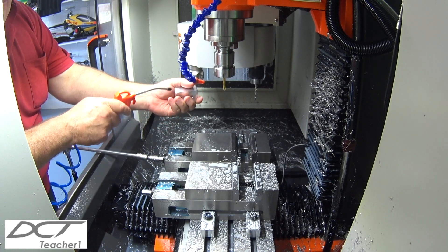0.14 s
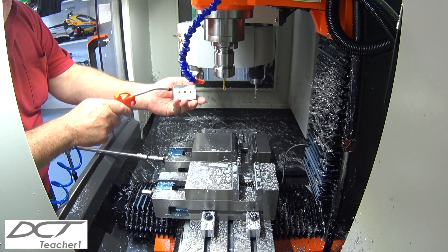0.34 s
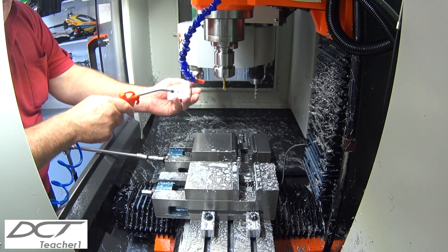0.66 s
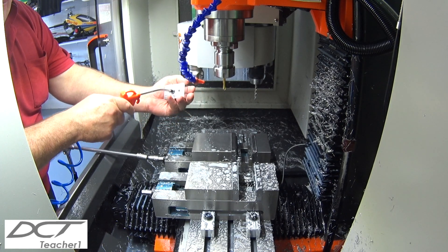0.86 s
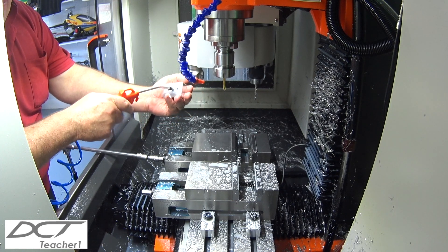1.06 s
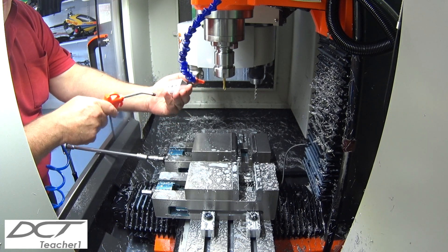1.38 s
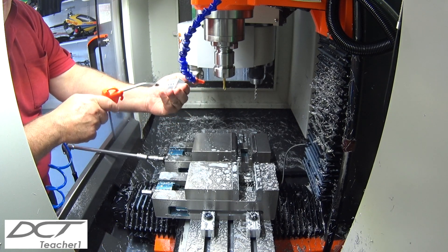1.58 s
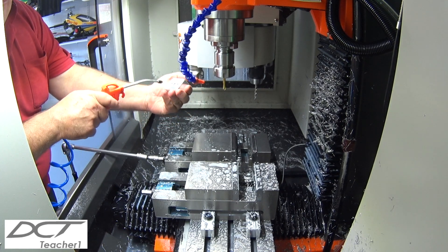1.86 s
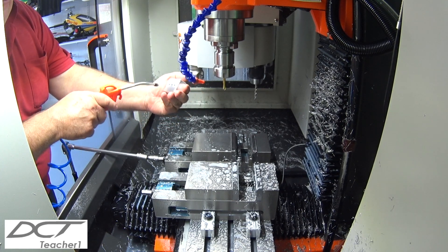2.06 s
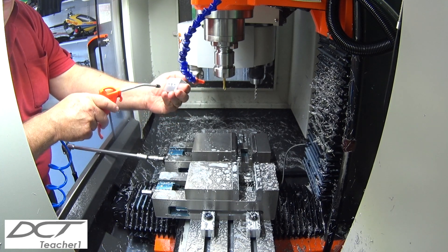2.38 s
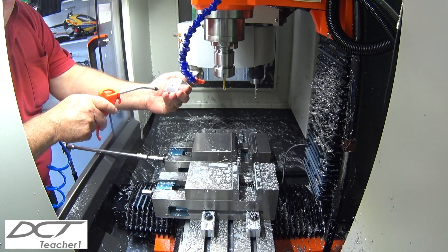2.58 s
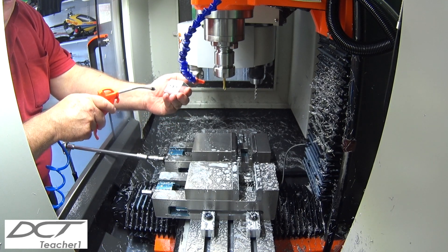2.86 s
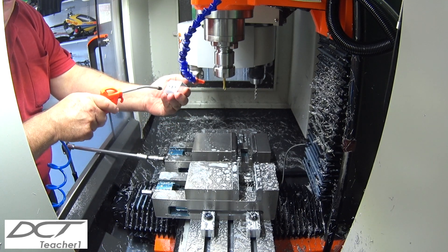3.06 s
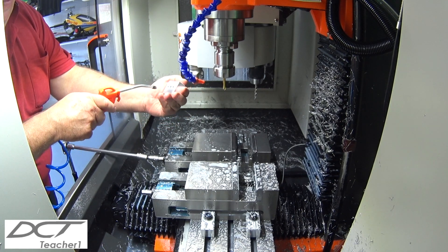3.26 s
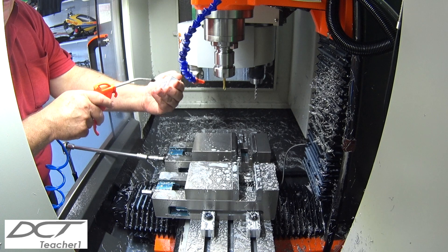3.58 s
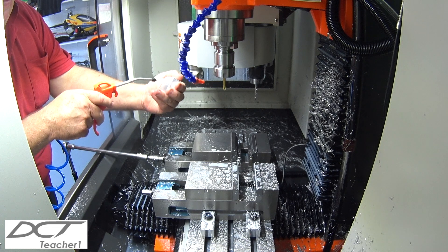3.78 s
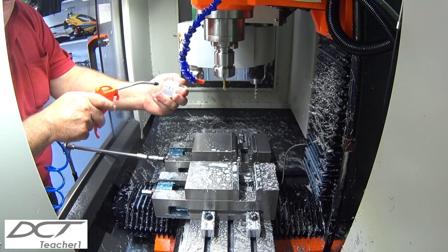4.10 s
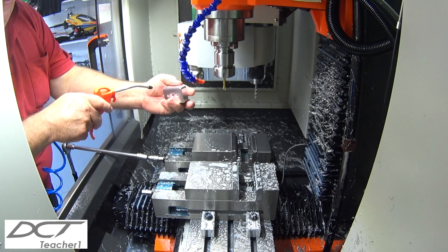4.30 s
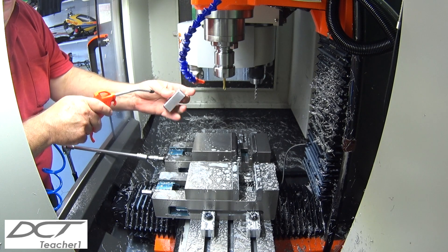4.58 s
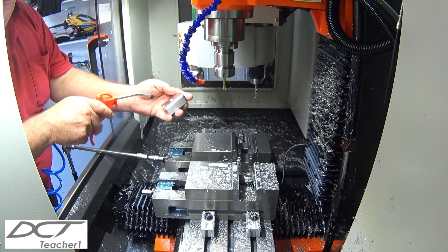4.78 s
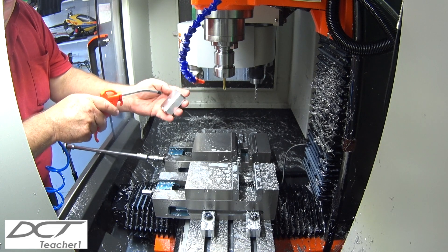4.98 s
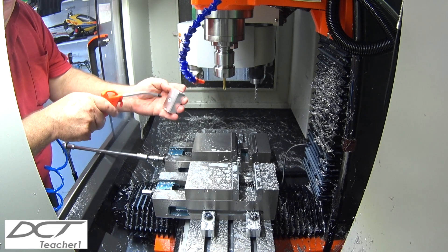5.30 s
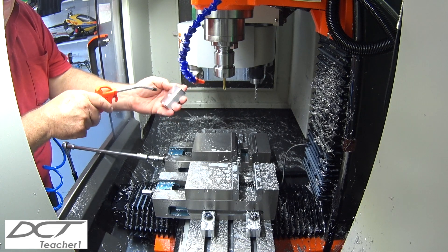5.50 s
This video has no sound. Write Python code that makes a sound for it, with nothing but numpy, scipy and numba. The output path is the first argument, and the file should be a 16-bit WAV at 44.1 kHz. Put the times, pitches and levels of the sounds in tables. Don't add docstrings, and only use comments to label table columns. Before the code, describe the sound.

A compressed-air blow gun hisses fiercely over a small drilled metal part, with flickering whistles, then two short bursts over a throbbing compressor hum.

```python
import sys
import numpy as np
from scipy import signal
from scipy.fft import rfft, irfft, next_fast_len
from scipy.io import wavfile
from scipy.ndimage import uniform_filter1d
from numba import njit

SR = 44100
rng = np.random.default_rng(int(sys.argv[2]) if len(sys.argv) > 2 else 0)


def how_loud(loudness_db):
    steps = np.asarray(loudness_db, float) / 20
    return 10 ** steps


def digitize_waveform(pressure):
    field = np.atleast_2d(pressure).T
    bounded = np.clip(field, -1, 1)
    quanta = np.round(bounded * 32767).astype(np.int16)
    wavfile.write(sys.argv[1], SR, quanta)


N = 249165
T = np.arange(N) / SR
HAND_T = T[::40]

# valve opens in seconds, shuts in seconds, gain control pushed to in dB.
TRIGGER = [
    (0, 2.19, -7),
    (3.034, 3.34, -8.5),
    (5.047, 6, -7.5),
]
OPEN_S, SHUT_S = 0.012, 0.012

# time in seconds, impact on the face in dB, nozzle turned to the camera in dB.
AIM = [
    [(0.0, 5, -1), (0.15, 3.5, 1), (0.3, 5, 2), (0.35, 4.5, 3), (0.41, -2.5, 0.5), (0.49, -0.5, -1.5),
     (0.58, -5.5, 4.5), (0.67, -4.5, 6), (0.76, 1, 3), (0.89, 0, 4.5), (1.09, -4.5, 6), (1.2, 0, 0),
     (1.64, -0.5, -0.5), (1.69, -7.5, -9.5), (1.73, 1.5, -4), (1.92, -2, -6), (1.99, 0, 1),
     (2.19, -3.5, -8)],
    [(3.04, -1.5, -6.5), (3.15, -4.5, 5), (3.23, 2.5, -6), (3.29, -4.5, -3.5), (3.34, -0.5, -8.5)],
    [(5.05, 4.5, -0.5), (5.2, 2, 4.5), (5.29, 0, 4), (5.45, 5.5, -4.5), (5.51, 5, 1.5), (5.65, 6, -3.5)],
]
# level in dB, share of impact (ratio), share of nozzle turn (ratio),
# level swallowed by a centred hole in dB, lift by the pocket (ratio).
PLACES = [
    (-30.5, 1.21, .05, 13.5, .2),
    (-42, 1.4, 0.058, 16.5, 0.36),
    (-27, 0.23, 0.13, 8.5, 0.11),
    (-34.5, 0.046, 0.98, 8.5, .05),
    (-44, 0.085, .5, 9, .1),
    (-51, .05, 1.2, 10.5, 0.044),
    (-41, 0.23, .05, 16, 0.008),
]
# frequency in Hz, density in dB per Hz.
HISS = [(180, -61), (300, -42), (775, -27), (836, -32), (1030, -24), (1310, -16.5), (1620, -13),
        (1830, -14), (2230, -17), (2440, -6.5), (4070, -4.5), (4870, -0.5), (8140, -16), (9600, -22.5),
        (11000, -27.5), (14300, -51.5), (22000, -120)]
FLUTTER_DB = 0.7

# start in seconds,
# length in seconds, whistle in dB, pitch in Hz, centred 0-1.
CROSSINGS = [(0.204, 0.024, -20, 5330, 0.3), (0.308, 0.016, -11.5, 5290, 0.73),
             (0.355, 0.038, -21, 5410, 0.24), (0.461, 0.11, -21.5, 5385, 0),
             (0.651, .083, -16.5, 5265, .75), (0.738, .054, -14, 5140, .9), (0.8, .031, -17, 5135, .85),
             (0.84, .028, -22, 5040, .8), (1.094, 0.0099, -9, 5145, 1), (1.11, 0.014, -27.5, 5250, 1),
             (1.214, 0.025, -18, 5300, 0.48), (1.245, .018, -16.5, 5120, .8),
             (1.272, .022, -15.5, 5345, .9), (1.304, 0.015, -25, 5200, .3), (1.377, 0.011, -16, 5280, 0.43),
             (1.472, 0.063, -26, 5250, 0.3), (1.548, .035, -25, 5300, 0), (1.589, 0.032, -16, 5120, 0.27),
             (1.745, 0.03, -20.5, 5350, 0.34), (1.818, 0.03, -25.5, 4980, 0.01),
             (1.882, 0.04, -18, 5240, .4), (2.001, 0.047, -14.5, 5224, 0.5),
             (2.092, 0.032, -18.5, 5190, 0.27), (2.126, 0.051, -26, 5170, 0.2),
             (3.02, 0.05, -18.5, 5106, .35),
    (3.08, 0.1, -21.5, 5360, .15),
    (3.195, 0.07, -17, 5160, .4),
    (3.295, 0.054, -23.5, 5217, .1),
    (5.15, 0.08, -22, 4800, .1),
    (5.25, 0.087, -29.5, 5350, .1),
]
IDLE_DB, IDLE_HZ = -29.5, 5120
WIDE_HZ, NARROW_HZ = 200, 31.9
CATCH_S, LET_GO_S, FADE_SHARE = 0.005, 0.012, 0.03
SINK_IN_SHARE, REFILL_S = 0.59, 0.03
SAG_HZ_PER_S, WANDER_SHARE, STRAND_HZ = 1100, 0.35, 90

# centre in seconds, length in seconds, ring in dB.
POCKET_PASSES = [(0.11, 0.015, -38), (0.196, 0.012, -27.5), (0.433, 0.023, -33.5), (0.518, 0.023, -34.5),
                 (0.81, 0.014, -36), (1.068, 0.013, -29), (1.19, 0.011, -29.5), (1.368, 0.021, -29.5),
                 (1.466, 0.012, -23.5), (1.538, 0.021, -24.5), (1.59, 0.048, -40.5), (1.656, 0.017, -27.5),
                 (1.738, 0.01, -32), (1.858, .025, -27), (1.968, 0.025, -23), (2.102, 0.017, -28),
                 (3.09, 0.015, -34), (3.158, 0.019, -30), (3.29, 0.019, -32.5), (5.4, 0.058, -40)]
POCKET_HZ, POCKET_WIDTH_HZ = 2432, 34

# start in seconds, peak in dB, upper part in dB, length in seconds.
PUFFS = [(0.222, -49, 7, 0.013), (0.322, -39, 6, 0.0085), (0.367, -36.5, -2, 0.012), (0.539, -46, 5, 0.04),
         (0.652, -37, -3, 0.022), (0.725, -40.5, -0.5, 0.022), (0.798, -46, -5, 0.015),
         (1.096, -38, -4, 0.0083), (1.233, -41.5, -14, 0.022), (1.306, -44.5, 5, 0.0095),
         (1.387, -48, 4, 0.0091), (1.492, -55, 10, 0.0086), (1.58, -52.5, 3.5, 0.028),
         (1.751, -45.5, 6, 0.011), (1.896, -36, -2.5, 0.012), (2.014, -32.5, -4.5, 0.016),
         (2.1, -41.5, -2, 0.032), (2.147, -61, 11.5, 0.013), (3.043, -38.5, -10.5, 0.022),
         (3.1, -49.5, 6.5, 0.039), (3.203, -39, -1, 0.025), (3.253, -39.5, -2, 0.016),
         (5.194, -52, 7.5, 0.017), (5.269, -52.5, 7, 0.023)]

# delay in ms, level in dB.
WALLS = [(2.3, -19.5), (3.7, -18), (5.3, -17), (7.9, -15), (11.3, -15), (15.7, -17)]
# frequency in Hz, width in Hz, boost in dB.
CABIN = [(1342, 89, 12), (1219, 61, 9.5), (2840, 160, 4), (3890, 140, 4)]
# frequency in Hz, t60 in seconds.
ROOM = [(700, 0.34), (2500, 0.49), (5200, 0.47), (9000, 0.3)]
# frequency in Hz, gain in dB.
ECHO = [(1000, -0.5), (3000, -3.5), (4500, -2), (5200, -1), (6200, -3.5), (10000, -4)]
ROOM_DB, DUCK_DB = -10.5, 4.5

# frequency in Hz, density in dB per Hz.
SHOP = [(18, -64), (30, -37.5), (92, -0.5), (146, -5.5), (173, -4), (243, -3.5), (541, -24), (798, -18),
        (1040, -20.5), (1330, -19), (1620, -20.5), (2630, -23), (3270, -25.5), (3880, -21), (10000, -49),
        (13000, -94), (22000, -120)]
# frequency in Hz, width in Hz, level in dB.
INTAKE = [(201, 8.4, -60.5), (245.3, 12, -59), (45, 60, -69.5), (312, 27, -68), (440, 15, -71),
          (615, 13, -69.5), (702, 16, -72), (2647, 330, -62.5), (3830, 170, -72), (4790, 81, -76),
          (5460, 500, -73.5)]
# frequency in Hz, level in dB.
DRONES = [
    (143, -56.5),
    (702, -73.5),
]
STROKE_HZ, STROKE_AT_S, THROB_DB = 7.87, 4.01, -48.5
MOTOR_HZ, MOTOR_DB = 818, -61

# frequency in Hz, side minus mid in dB.
SIDE_COLOUR = [(60, -32.5), (150, -17.5), (340, -12.5), (600, -0.5), (1060, -6.5), (1900, -6.5), (3100, -4.5),
               (3900, -16), (5600, -23), (6800, -4.5), (9000, -6), (11000, -11.5)]
# frequency in Hz, level in dB.
LAG = [(300, -33.5), (700, -6.5), (1300, -8), (2500, -24), (3800, -26.5), (5500, -34), (9000, -24)]
RIGHT_DB, SIDE_DB, PUFF_SIDE_DB = 0.6, -2, -2
TOP_GAIN_DB, SINK_DB_PER_S, RECOVER_S, RECOVER_BEND = 2.5, 2.5, 0.85, 1.43
LIMIT_DB, CEILING = -16.5, 0.43


def jet():
    hz, blown_db, width_hz, swallowed = crossings()
    passes = pocket_passes()
    *hiss_db, pocket_db = jet_db(swallowed, passes)
    ring_db = 20 * np.log10(how_loud(pocket_db) + passes)
    flow = valve()
    return reflect(flow * hiss(*hiss_db)) + flow * holes(hz, blown_db, width_hz, ring_db)


def valve():
    flow = 0
    for open_s, shut_s, _ in TRIGGER:
        rise = np.clip((T - open_s) / OPEN_S + 1, 0, 1) ** 2
        flow = flow + rise * np.exp(-np.maximum(T - shut_s, 0) / SHUT_S)
    return flow


def jet_db(swallowed, passes):
    impact_db, turn_db = curves(sum(AIM, []))
    over_pocket_db = 20 * np.log10(1 + passes / how_loud(-36))
    return [db + impact * impact_db + turn * turn_db - swallow_db * swallowed + lift * over_pocket_db
            for db, impact, turn, swallow_db, lift in PLACES]


def hiss(face_db, hand_db, edge_db, nozzle_db, finger_db, tip_db):
    air = colour(rng.standard_normal(N), HISS, CABIN[:3])

    def place(db, lo_hz, hi_hz, band_db, flutter_db=FLUTTER_DB):
        return how_loud(db + flutter_db * walk(40)) * level(band(air, lo_hz, hi_hz), band_db)

    out = place(hand_db, 250, 2375, 0.22)
    out += place(face_db, 2170, 3867, 0.52)
    out += place(edge_db, 4057, 6360, 1.5)
    out += place(nozzle_db, 6280, 11000, 0.16, flutter_db=1.4)
    out += place(finger_db, 1463, 2244, 0)
    out += place(tip_db, 9060, 11560, 0)
    return how_loud(FLUTTER_DB * walk(35)) * out


def holes(hz, blown_db, width_hz, pocket_db):
    width_hz = np.clip(width_hz, 40, 900)
    blur = 0.8 + 0.35 * np.maximum(-23 - blown_db, 0)
    apart_hz = 1.01 * np.maximum(width_hz - 45, 0)
    strand_hz = blur * np.minimum(width_hz, STRAND_HZ)
    upper = whistle(hz + apart_hz + 20 * walk(45), strand_hz)
    lower = np.clip(apart_hz / 30, 0, 1) * whistle(hz - apart_hz, strand_hz)
    drop_out_db = 0.43 * np.minimum(blown_db + 29.0, 0)
    hole = (upper + lower) * how_loud(blown_db - 6.0 + drop_out_db + 2 * walk(45))
    octave = band(hole ** 2, 9000, 11500) * how_loud(-21)
    ring = svf(rng.standard_normal(N), POCKET_HZ + 12 * walk(13), POCKET_WIDTH_HZ + 0 * T)
    pocket = level(band(ring, 2100, 2930), -4.5)
    return hole + octave + pocket * how_loud(pocket_db + 0.4 * np.minimum(pocket_db + 37.5, 0))


def whistle(hz, width_hz):
    ringing = svf(svf(rng.standard_normal(N), hz, width_hz), hz, 3.3 * width_hz)
    tone = level(ringing / np.sqrt(width_hz), 0)
    swing = uniform_filter1d(tone ** 2, size=60) ** 0.5
    return level(tone / (0.8 + swing), 0)


def crossings():
    blown, pitch, focus, swallowed = how_loud(IDLE_DB), how_loud(IDLE_DB) * IDLE_HZ, 0, 0
    for start, length, db, hz, centred in CROSSINGS:
        size = how_loud(db) * held(start, CATCH_S, length, LET_GO_S + FADE_SHARE * length)
        sag_hz = SAG_HZ_PER_S * np.clip(HAND_T - start - length / 2, -length, length)
        blown = blown + size
        pitch = pitch + size * (hz - sag_hz)
        focus = focus + size * centred
        sunk = np.clip(centred, 0, 1) * held(start, SINK_IN_SHARE * length, length, REFILL_S)
        swallowed = 1 - (1 - swallowed) * (1 - sunk)
    width_hz = WIDE_HZ + (NARROW_HZ - WIDE_HZ) * np.clip(1.25 * focus / blown, 0, 1)
    controls = (pitch / blown, 20 * np.log10(blown), width_hz, swallowed)
    hz, blown_db, width_hz, swallowed = map(smooth, controls)
    hz = hz + WANDER_SHARE * (width_hz - NARROW_HZ) * walk(30)
    return hz, blown_db, width_hz, swallowed


def pocket_passes():
    return smooth(sum(how_loud(db) * bump(s, length) for s, length, db in POCKET_PASSES))


def puffs():
    thud = level(band(rng.standard_normal(N), 35, 300), 0)
    rush = level(band(rng.standard_normal(N), 300, 1100), 0)
    low, high = valve() * how_loud(-65 + 2.2 * walk(22)) * how_loud([[0], [7]])
    for start, db, upper_db, length in PUFFS:
        gust = smooth(how_loud(db - 6.5) * bump(start + length, length))
        low = low + gust
        high = high + how_loud(upper_db) * gust
    return low * thud + high * rush


def reflect(x):
    taps = np.zeros(SR // 40)
    taps[0] = 1
    for ms, db in WALLS:
        taps[int(ms * SR / 1000)] = how_loud(db)
    return signal.fftconvolve(x, taps / np.sqrt(np.sum(taps ** 2)))[:N]


def echo(x, decays, size):
    t = T[:size]
    tail = 0
    for hz, t60 in decays:
        noise = band(rng.standard_normal(size), hz / 1.31, min(hz * 1.386, 15000))
        tail = tail + noise * 1000 ** (-t / t60)
    return signal.fftconvolve(x, tail / np.sqrt(np.sum(tail ** 2)))[:N]


def shop():
    phase = ((T - STROKE_AT_S) * STROKE_HZ) % 1
    throb = 0.55 + 0.67 * np.cos(2 * np.pi * (phase - 0.72))
    twelfth = np.sin(2 * np.pi * 12 * STROKE_HZ * T)
    intake = how_loud(THROB_DB + 0.87 * walk(6.7)) * throb * twelfth
    for hz, db in DRONES:
        swell = how_loud(db + 4.5 + 2.0 * walk(9))
        intake += swell * np.sin(2 * np.pi * np.cumsum(hz * (1 + 0.00702 * walk(6.6))) / SR)
    one = np.ones(N)
    for hz, width_hz, db in INTAKE:
        ring = svf(rng.standard_normal(N), hz * one, width_hz * one)
        intake += level(svf(ring, hz * one, 3 * width_hz * one), db)
    noise = level(colour(rng.standard_normal(N), SHOP, CABIN), -48.0)
    steady = band(noise, 6.5, 1100) * how_loud(-4.0 + 1.4 * walk(4.8))
    stroke = 0.59 + 1.3 * np.exp(-phase / 0.5) * (1 - np.exp(-phase / 0.07))
    valves = band(noise, 1100, 4400) * stroke ** 0.4 * how_loud(1.1 * walk(14))
    valves += band(noise, 4400, 6300) * stroke * how_loud(-0.5)
    valves += band(noise, 6300, 9200) * stroke * how_loud(-7.0 + 1.2 * walk(14))
    return intake + steady + valves


def motor():
    tone = np.sin(2 * np.pi * (MOTOR_HZ * T + rng.random()))
    return np.sqrt(2) * how_loud(MOTOR_DB + 0.787 * walk(36)) * tone


def gain_control():
    db = np.zeros(N)
    for open_s, shut_s, pushed_db in TRIGGER:
        depth_db = TOP_GAIN_DB - pushed_db + SINK_DB_PER_S * (np.minimum(T, shut_s) - open_s)
        back = np.exp(-(np.maximum(T - shut_s, 0) / RECOVER_S) ** RECOVER_BEND)
        db = np.where(T >= open_s, TOP_GAIN_DB - depth_db * back, db)
    return how_loud(uniform_filter1d(db, size=1000))


def level(x, db):
    return x * how_loud(db) / np.sqrt(np.mean(x ** 2))


def colour(x, points, peaks=()):
    size = next_fast_len(len(x))
    f = np.maximum(np.arange(size // 2 + 1) * SR / size, 1)
    hz, db = np.transpose(points)
    gain = how_loud(np.interp(np.log(f), np.log(hz), db))
    for centre_hz, width_hz, boost_db in peaks:
        gain = gain * how_loud(boost_db / (1 + (2 * (f - centre_hz) / width_hz) ** 2))
    return irfft(rfft(x, size) * gain, size)[:len(x)]


def band(x, lo_hz, hi_hz):
    return signal.sosfilt(signal.butter(4, [lo_hz, hi_hz], "band", fs=SR, output="sos"), x)


@njit
def svf(x, hz, width_hz):
    y, b, l = np.empty(len(x)), 0., 0.
    for i in range(len(x)):
        g, k = np.tan(np.pi * hz[i] / SR), width_hz[i] / hz[i]
        v = (b + g * (x[i] - l)) / (1 + g * (g + k))
        b, l, y[i] = 2 * v - b, l + 2 * g * v, k * v
    return y


def walk(rate_hz):
    k = int(SR / rate_hz)
    steps = np.repeat(rng.standard_normal(N // k + 1), k)
    return 1.757 * uniform_filter1d(uniform_filter1d(steps, k), k)[:N]


def held(start, rise, length, release):
    fall = np.exp(-np.maximum(HAND_T - start - length, 0) / release)
    return np.clip((HAND_T - start) / rise, 0, 1) * fall


def bump(centre, length):
    return np.exp(-0.5 * ((HAND_T - centre) / length) ** 2)


def smooth(control):
    return np.interp(T, HAND_T, control)


def curves(table):
    s, *columns = np.transpose(table)
    return [np.interp(T, s, c) for c in columns]


def sources():
    blast = jet()
    cabin = how_loud(ROOM_DB - DUCK_DB * valve()) * colour(echo(blast, ROOM, size=40000), ECHO)
    return blast + cabin + gain_control() * (shop() + motor())


def scene():
    mid = sources()
    late = np.imag(signal.hilbert(mid, next_fast_len(N)))[:N]
    side = colour(sources(), SIDE_COLOUR) * how_loud(SIDE_DB)
    side += colour(late, LAG)
    side += colour(puffs(), [(60, -14.5), (500, PUFF_SIDE_DB), (2000, 2)])
    mid = mid + puffs()
    return np.array([(mid + side) * how_loud(-RIGHT_DB / 2), (mid - side) * how_loud(RIGHT_DB / 2)])


def roll_off(x):
    return signal.sosfilt(signal.butter(12, 11180, fs=SR, output="sos"), x)


def record(dry):
    envelope = np.sqrt(uniform_filter1d(np.mean(dry ** 2, axis=0), size=300) + 1e-12)
    limited = dry / (1 + (envelope / how_loud(LIMIT_DB)) ** 4) ** 0.2
    clipped = CEILING * np.tanh(limited / CEILING)
    mix = signal.sosfilt(signal.ellip(8, 0.3, 60, 11060, fs=SR, output="sos"), clipped)
    return roll_off(mix)


dry = scene()
out = record(dry)
digitize_waveform(out)
```